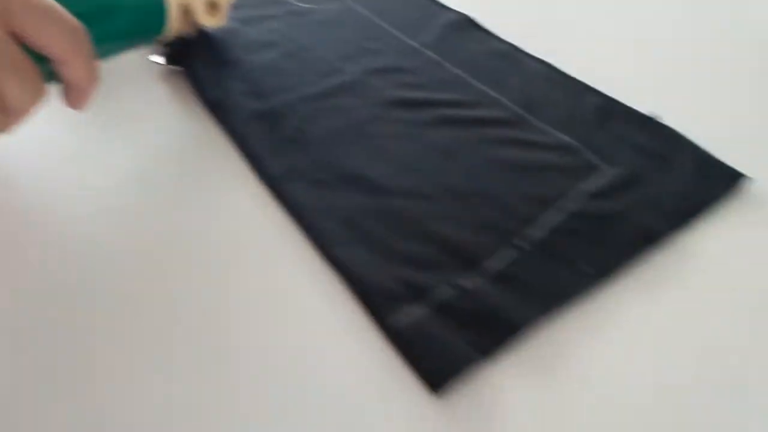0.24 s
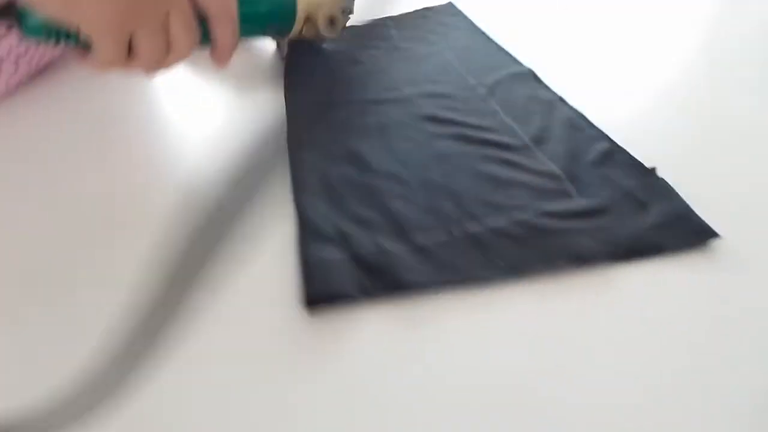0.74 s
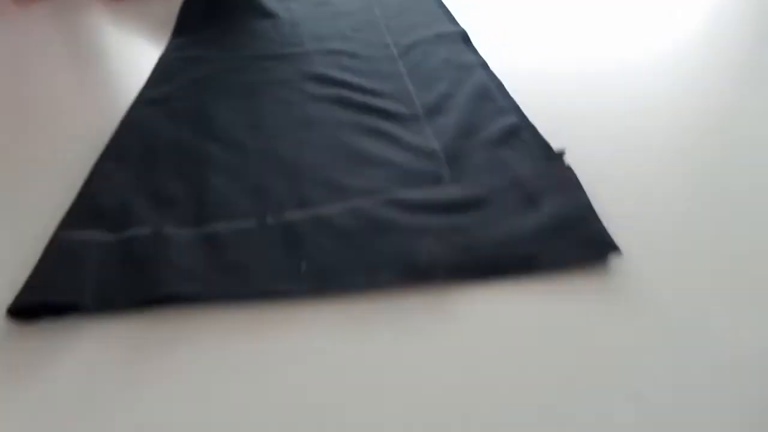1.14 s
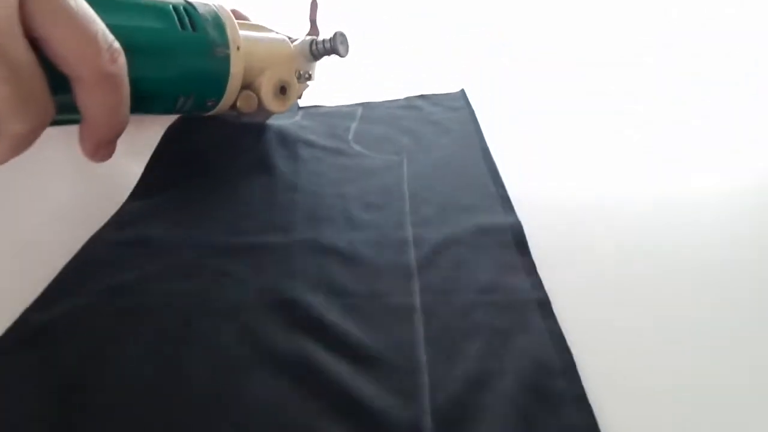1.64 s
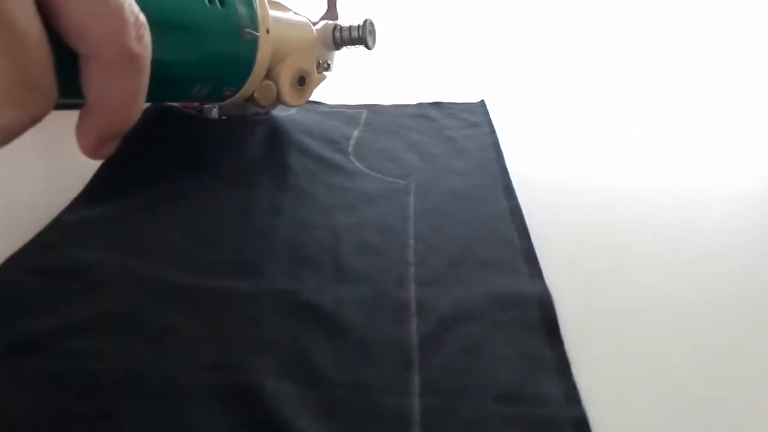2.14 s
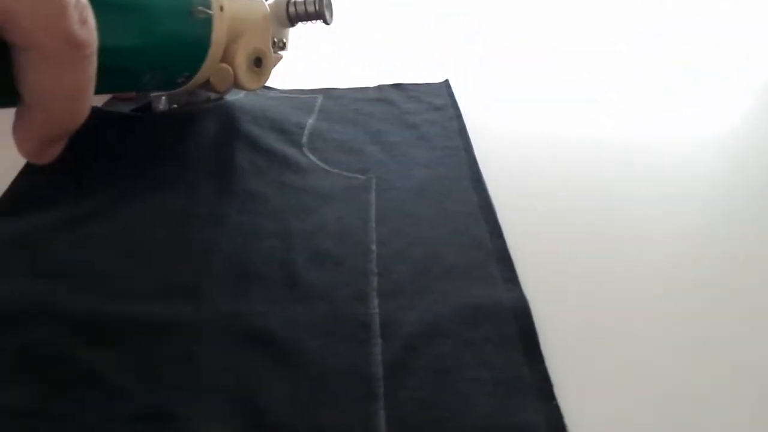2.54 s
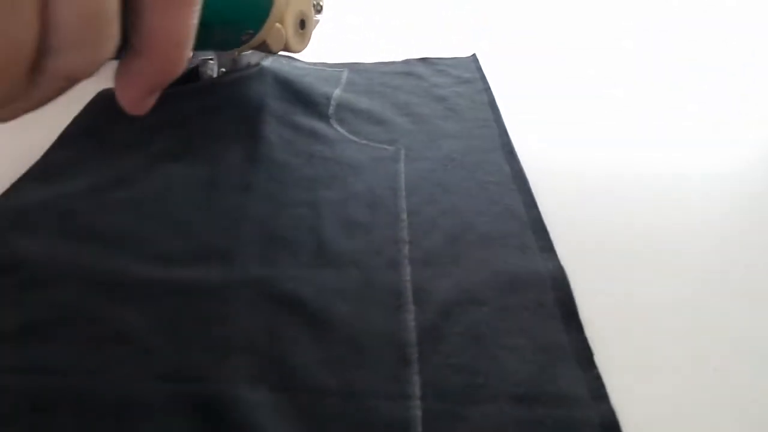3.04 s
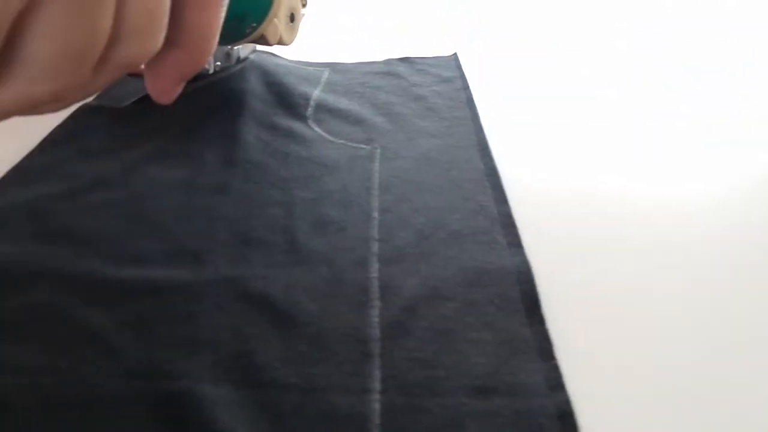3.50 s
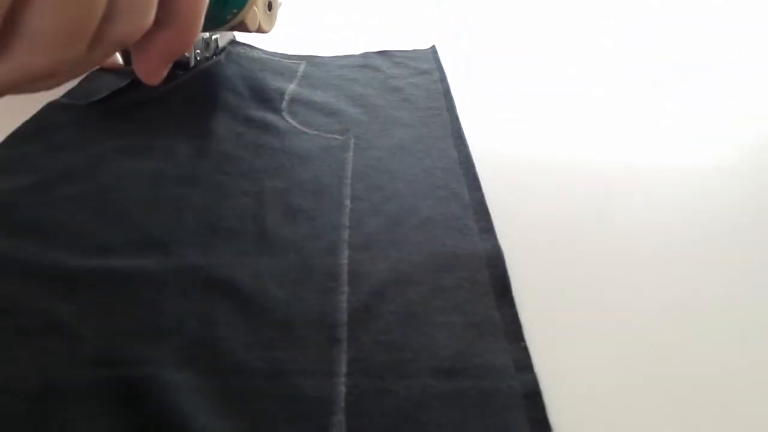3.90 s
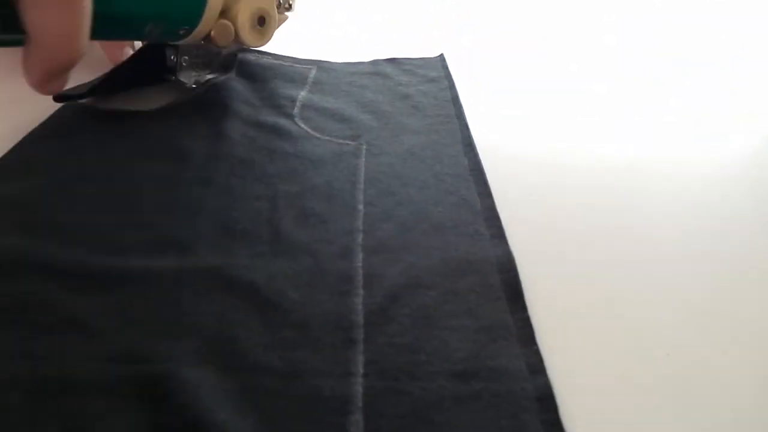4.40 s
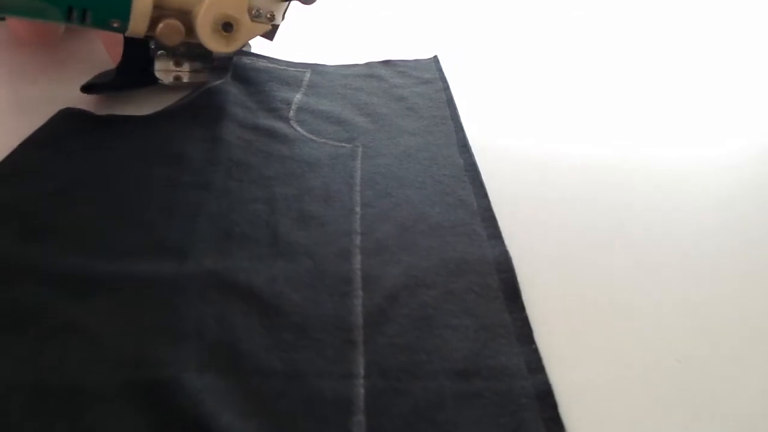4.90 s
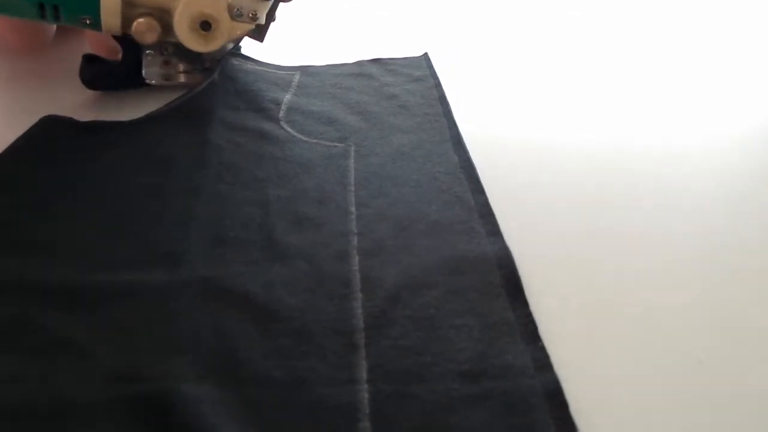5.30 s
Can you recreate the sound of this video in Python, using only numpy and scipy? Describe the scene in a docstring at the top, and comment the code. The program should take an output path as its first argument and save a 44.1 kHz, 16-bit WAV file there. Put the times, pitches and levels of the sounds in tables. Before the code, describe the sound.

A handheld electric round-blade cutter runs through cloth on a table, close to a stereo microphone in a quiet room. It is at full speed from the start: a motor hum throbbing about four times a second, a fast buzzing gear rattle, a hiss of cooling air that slowly fades, and a rapid, even scraping from the blade. High, thin metallic tones come and go as the blade rubs its guard. The scraping is strongest from about 1 to 3.5 seconds. At 4.2 seconds the motor switches off and the blade coasts to rest within a third of a second, with a short squeak near 4.4 and a few small clicks around 4.5. Separate light, sharp clicks from the tool follow at about 4.9, twice near 5.3, and at 5.5. Faint hiss and room murmur remain, with a faint low drone rising at the very end.

```python
"""A handheld round-blade cutter runs through cloth on a table, close to a stereo microphone in a quiet room.
From the start its motor hums and beats against the mains, the gear rattles once a shaft turn, cooling
air hisses, and the blade scrapes once a blade turn and sings against its guard in spells.
Switched off after about four seconds, it coasts to rest with a squeak and the tool clicks a few times.
A faint background hiss and room murmur come up again, and a low drone rises at the very end."""
import sys
import numpy as np
from scipy import signal
from scipy.fft import rfft, irfft
from scipy.io import wavfile
from scipy.ndimage import uniform_filter1d

SR = 44100
rng = np.random.default_rng(int(sys.argv[2]) if len(sys.argv) > 2 else 0)


def master(y):
    """Save y as 16-bit WAV."""
    cut = np.clip(np.atleast_2d(y).T, -1, 1)
    pcm = np.round(cut * 32767)  # scale
    wavfile.write(sys.argv[1], SR, pcm.astype(np.int16))


N = 244755
TIME, FREQS = np.arange(N) / SR, np.fft.rfftfreq(N, 1 / SR)
MAINS_HZ, GEAR_RATIO = 60.023, 5
SWITCH_OFF_S, COAST_S = 4.24, 0.33
LEFT_LEAD_S = 0.00014   # the cutter reaches the left of the microphone first
SCRAPE_POWER = 0.99   # the blade's touches fade with this power of the speed


def from_db(db):
    """Decibels to gain."""
    return 10 ** (np.asarray(db) / 20)


def rms_one(x):
    """Scale to unit power."""
    return x / np.sqrt(np.mean(x ** 2) + 1e-20)


def in_time(rows):
    """Each column of a curve at every sample."""
    seconds, *columns = np.transpose(rows)
    return [np.interp(TIME, seconds, column) for column in columns]


def over_hz(points):
    """A table joined on a log-frequency axis."""
    hz, value = np.transpose(points)
    return np.interp(np.log(FREQS + 1), np.log(hz), value)


def drift(rate_hz):
    """Slow random wavering of unit power, mostly below the given rate."""
    slow_hz = np.fft.rfftfreq(4096, 100 / SR)
    slow = irfft(rfft(rng.standard_normal(4096)) / (1 + (slow_hz / rate_hz) ** 2))
    return np.interp(np.arange(N) / 100, np.arange(len(slow)), rms_one(slow))


def grains(spread_db, count=3, size=N):
    """Unrelated streams of dense tiny contacts of uneven size."""
    contacts = rng.standard_normal((count, size))
    return rms_one(contacts * from_db(spread_db * rng.standard_normal((count, size))))


def once_a_turn(turns, angle, width, uneven_db, linger=3.0):
    """A bump of new strength each turn, falling `linger` times slower than it rises; angles in turns."""
    offset = turns - angle + .5
    strength = from_db(uneven_db * rng.standard_normal(1024))
    past = offset % 1 - .5
    bump = np.exp(-.5 * (past / width / np.where(past > 0, linger, 1)) ** 2)
    return strength[np.floor(offset).astype(int)] * bump


def wander():
    """Three random walks in phase; each blurs a tone to a width of 1 Hz."""
    walks = np.cumsum(rng.standard_normal((3, N)), axis=1)
    return uniform_filter1d(walks, size=14) * np.sqrt(2 * np.pi / SR)


def rubbed(pitch_hz, width_hz, walk):
    """A rubbed mode of unit power: even in strength, blurred in pitch."""
    phase = 2 * np.pi * np.cumsum(pitch_hz + np.zeros(N)) / SR
    return np.sqrt(2) * np.cos(phase + np.sqrt(width_hz) * walk)


def spell(start_s, length_s, swell_s, fade_s):
    """An envelope that swells up to its start, holds, then fades."""
    before = np.maximum(start_s - TIME, 0) / swell_s
    after = np.maximum(TIME - start_s - length_s, 0) / fade_s
    return np.exp(-np.minimum(before + after, 20))


def soft_noise(spectrum, spread_db, width):
    """A steady stereo noise of the given colour."""
    mid, side = irfft(rfft(grains(spread_db, count=2)) * from_db(over_hz(spectrum)), N)
    return rms_one(mid) + width * rms_one(side) * [[1], [-1]]


def at_microphone(streams, colour_db, lead_s=LEFT_LEAD_S):
    """One stream reaches both sides directly, the other two are each side's scatter; unit power."""
    # How alike the sides are. Each row: frequency in Hz, likeness (held to 0-1 below).
    likeness = [(100, -1.4), (400, 1.2), (700, 1.0), (1200, 0.3), (2500, 0.4), (5000, 0.46), (9000, -0.73),
                (15000, -0.5)]
    # The cutter's lean to one side. Each row: frequency in Hz, left over right in dB.
    tilt = [(60, -27), (92, -6), (140, 16), (210, -20), (330, 23), (500, -6), (770, 0), (1170, -1.5),
            (1790, -6), (2740, -11), (4190, -3), (6410, 3), (9810, 12), (15000, 3)]
    direct, *scattered = rfft(streams) * from_db(colour_db)
    alike = np.clip(over_hz(likeness), 0, 1)
    place = from_db(over_hz(tilt) / 2) * np.exp(1j * np.pi * FREQS * lead_s)
    pair = (np.sqrt(alike) * direct + np.sqrt(1 - alike) * np.array(scattered)) * [place, 1 / place]
    return rms_one(irfft(pair / np.hypot(abs(place), 1 / abs(place)), N))


def speed_share():
    """Share of full speed: without power, friction brakes the shaft evenly."""
    return np.clip(1 - (TIME - SWITCH_OFF_S) / COAST_S, 0, 1)


def coasting(power, room_t60_s=0.32):
    """Gain of a sound that falls with a power of the speed and lingers briefly in the room."""
    retained = from_db(-60 / (room_t60_s * SR)) ** 2
    lost = signal.lfilter([1 - retained], [1, -retained], 1 - speed_share() ** (2 * power))
    return np.sqrt(np.maximum(1 - lost, 0))


def beat(turns, field_turns=-0.055):
    """How far the shaft has run ahead of the pulsing field, in radians."""
    return 2 * np.pi * (turns - 2 * MAINS_HZ * TIME - field_turns)


def shaft_turns(start_turns=-0.119, sway_turns=0.022):
    """The shaft's angle; under power it sways about four times a second, at its beat with the field."""
    # Motor speed under power. Each row: time in seconds, shaft turns per second.
    speed = [(0.0, 123.13), (0.8, 123.94), (1.3, 124.32), (2.0, 123.42), (2.5, 124.61), (2.7, 123.92),
             (4.0, 124.71), (4.24, 126.94)]
    turns = start_turns + np.cumsum(in_time(speed)[0] * speed_share()) / SR
    return turns - sway_turns * np.sin(beat(turns)) * (TIME < SWITCH_OFF_S)


def motor_hum(turns, level_db=-29.5, flutter_turns=0.003, waver_db=0.8, die_s=0.0049):
    """Shaft orders mix with the pulsing field; each line swells once a beat and may throb with a partner."""
    # The hum changes colour as the tool turns. Times in seconds: far, near, moving off.
    colour_times = (1.0, 1.8, 3.9)
    # Magnetic lines. Each row: multiple of shaft speed, multiple of the field's pulsing, relative dB
    # far, near and moving off, swell 0-1, swell lag in beats, weaker partner's strength 0-1,
    # its offset in beat rates, throb lag in beats.
    magnetic_lines = [(0, 1, -26, -27, -29, 0, 0, 0, 0, 0), (3, 0, -13.5, -11, -11.5, .1, .38, 0, 0, 0),
                      (3, 1, -5.3, -3.1, -3.7, .15, .02, .42, 2, -.12),
                      (5, 0, -1, 3.2, 1.3, .2, .09, .5, -2, -.015),
                      (5, 1, -5, -5.5, -9.5, .42, .48, .36, -2, .06),
                      (6, 1, -11.5, -13.5, -15, .25, 0, .15, -2, -.14),
                      (7, 1, -13, -13, -14, .2, .23, .4, -2, -.08),
                      (9, 0, -13, -8.5, -8.5, .45, .45, 0, 0, 0), (10, 0, -20, -17, -17, .45, .4, 0, 0, 0),
                      (10, 1, -10.5, -8.5, -9, .25, .04, .12, 2, -.21)]
    # The uneven blade wheel. Each row: multiple of blade speed, relative level in dB.
    wobble = [(6, -30), (11, -32), (12, -23.5), (13, -26), (18, -20), (24, -15.5), (26, -34)]
    field, ahead = 2 * MAINS_HZ * TIME, beat(turns)
    poles = turns + flutter_turns * drift(9.0)
    lines = 0
    for order, field_order, *levels_db, swell, swell_lag, partner, offset, throb_lag in magnetic_lines:
        swelling = swell * np.cos(ahead - 2 * np.pi * swell_lag)
        throb = partner * np.exp(1j * offset * (ahead - 2 * np.pi * throb_lag))
        tone = np.exp(2j * np.pi * (order * poles + field_order * field))
        gain = from_db(np.interp(TIME, colour_times, levels_db) + waver_db * drift(8.9))
        lines = lines + gain * np.imag((1 + swelling + throb) * tone)
    wheel = sum(from_db(db) * np.sin(2 * np.pi * order * turns / GEAR_RATIO) for order, db in wobble)
    powered = np.exp(-np.maximum(TIME - SWITCH_OFF_S, 0) / die_s)
    left = from_db(level_db) * (lines + wheel) * powered
    return np.array([left, np.interp(TIME - LEFT_LEAD_S, TIME, left)])


def housing(ripple_db=2.5, spacing_hz=45):
    """The housing's response in dB: a few strong resonances over many small ones."""
    # Each row: frequency in Hz, width in Hz, lift in dB.
    resonances = [(1829, 153, 4.5), (2360, 72, -1.5), (2990, 290, 5), (4300, 100, 0), (5730, 220, 6.5),
                  (6160, 150, 6.5), (8490, 630, 7.5), (11600, 400, 10), (12500, 900, 5), (15600, 250, 7)]
    strong = sum(lift_db / (1 + (2 * (FREQS - hz) / width) ** 2) for hz, width, lift_db in resonances)
    small = np.interp(FREQS / spacing_hz, np.arange(2048), rng.standard_normal(2048))
    return strong + ripple_db * small


def gear_rattle(knock, feed, housing_db, free_db=-17.5, feed_db=-2.5):
    """The teeth grind in mesh and knock once a shaft turn, a little quieter under load."""
    # Each row: frequency in Hz, relative spectral level in dB.
    spectrum = [(30, -62), (120, -24), (220, -59), (400, -68), (700, -11.5), (1200, -12), (1800, -7.5),
                (2500, -7), (3500, 2.5), (4800, 2.5), (5600, -13), (6400, -10.5), (7000, -24), (9500, -27),
                (16000, -32.5)]
    grind = np.where(TIME < SWITCH_OFF_S, .62, .6)
    gain = from_db(free_db + feed_db * feed) * coasting(power=1.2)
    return gain * at_microphone(grains(4.15) * (grind + knock), over_hz(spectrum) + housing_db)


def blade_scrape(turns, feed, housing_db, free_db=-26, feed_db=6, surge_db=1):
    """The slightly warped blade touches its counter-edge twice in quick succession each blade turn."""
    # Each row: frequency in Hz, relative spectral level in dB.
    spectrum = [(30, -74), (300, -30.5), (1300, -17.5), (1650, -3), (2300, 2), (2600, -6), (3000, -0.5),
                (4000, -3), (6000, -11.5), (9000, -22.5), (16000, -58)]
    blade = turns / GEAR_RATIO
    first = once_a_turn(blade, angle=0.95, width=0.012, uneven_db=2.5)
    second = 0.84 * once_a_turn(blade, angle=0.15, width=0.012, uneven_db=2.0)
    # The touches are harder on each swell of the motor's pull.
    touch = (first + second) * from_db(surge_db * np.cos(2 * beat(turns)))
    gain = from_db(free_db + feed_db * feed) * coasting(SCRAPE_POWER)
    return gain * at_microphone(grains(3.4) * (0.5 + touch), over_hz(spectrum) + housing_db)


def cooling_air(housing_db, start_db=-20.5, fade_db_per_s=2, flicker_db=1.67):
    """A flickering hiss of air that fades as the vents turn away from the microphone."""
    # Each row: frequency in Hz, relative spectral level in dB.
    spectrum = [(30, -54), (300, -5), (1500, 9.5), (5000, 8), (8200, -1.5), (9300, -12), (11000, -6),
                (12300, -8.5), (14000, -23), (16000, -10.5)]
    flow = grains(1.0) * from_db(flicker_db * drift(31))
    gain = from_db(start_db - fade_db_per_s * TIME) * coasting(power=0.54)
    return gain * at_microphone(flow, over_hz(spectrum) + housing_db)


def blade_song(knock, steady=0.22, pitch_sag=0.17):
    """The blade sings against its guard in spells, rasping at each knock and sagging as it slows."""
    # Each row: start and length in seconds, first and last pitch at full speed in Hz,
    # width in Hz, relative level in dB.
    songs = [(0.22, 0.14, 3950, 4090, 90, -21), (0.38, 0.35, 4130, 4450, 210, -17.5),
             (0.42, 0.3, 6200, 6330, 110, -25.5), (0.0, 0.72, 15600, 15650, 60, -38),
             (0.0, 0.32, 11400, 11550, 250, -36), (0.99, 0.28, 1860, 1810, 90, -28),
             (1.05, 0.22, 6200, 6250, 150, -29), (0.9, 1.35, 8380, 8450, 200, -32),
             (1.15, 0.6, 11750, 11800, 250, -38), (1.6, 1.45, 6310, 6290, 60, -33),
             (1.6, 0.4, 5000, 4900, 300, -29), (2.1, 0.45, 2950, 2970, 40, -30),
             (2.05, 1.05, 4450, 4450, 250, -26), (3.2, 0.75, 4510, 4560, 65, -21),
             (4.05, 0.33, 4560, 4630, 80, -24.5)]
    walk, sag = wander(), 1 - pitch_sag * (1 - speed_share())
    song = 0
    for start_s, length_s, first_hz, last_hz, width_hz, db in songs:
        pitch_hz = sag * np.interp(TIME, [start_s, start_s + length_s], [first_hz, last_hz])
        envelope = from_db(db) * spell(start_s, length_s, swell_s=0.054, fade_s=0.018)
        song = song + envelope * rubbed(pitch_hz, width_hz, walk)
    return song * rms_one((steady + knock) * coasting(power=0.47))


def blade_ticks(blade, feed, full_feed_db=4):
    """The blade rings once a turn as it touches, louder the harder it is pushed."""
    # Each row: frequency in Hz, width in Hz, relative level in dB, fall time over rise time.
    modes = [(1815, 50, -24, 3.2), (2975, 25, -22, 4.5)]
    walk, ticks = wander(), 0
    for hz, width_hz, db, linger in modes:
        touch = once_a_turn(blade, angle=0.98, width=0.022, uneven_db=0.5, linger=linger)
        ticks = ticks + from_db(db) * rubbed(hz, width_hz, walk) * touch
    return ticks * from_db(full_feed_db) * feed * coasting(SCRAPE_POWER)


def background_hiss_and_room(hiss_db=1):
    """A faint background hiss and low room murmur, whose level sinks midway and rises again at the end."""
    # Hiss, then room. Each row: frequency in Hz, relative spectral level in dB.
    hiss_spectrum = [(410, -23), (700, -5), (777, -7.5), (3110, -3.5), (4550, -6.5), (6150, -17.5),
                     (10700, -26), (15000, -25), (16000, -26)]
    room_spectrum = [(25, -40), (50, -14), (75, 2), (107, 7.5), (150, 3.5), (190, -1.5), (226, 6),
                     (266, -2), (313, 2), (600, 2), (900, -8), (1500, -36)]
    # Each row: time in seconds, gain of both in dB.
    background = [(0, -52.5), (1.8, -50.5), (3.6, -57.5), (4.8, -57.5), (5.5, -50.5)]
    hiss = from_db(hiss_db) * soft_noise(hiss_spectrum, spread_db=0.5, width=1.0)
    room = soft_noise(room_spectrum, spread_db=3.5, width=0.27)
    return from_db(in_time(background)[0]) * (hiss + room)


def blade_squeaks(edge_s=0.009, width_hz=70.3):
    """The slowing blade rubs and squeaks as it comes to rest."""
    # Each row: start in seconds, length in seconds, pitch in Hz, relative level in dB.
    squeaks = [(4.36, 0.063, 2450, -31), (4.52, 0.03, 2470, -39.5), (4.585, 0.0093, 2340, -41.5)]
    walk = wander()
    return sum(from_db(db) * spell(start_s, length_s, edge_s, edge_s) * rubbed(hz, width_hz, walk)
               for start_s, length_s, hz, db in squeaks)


def cutter(scatter=0.4, blade_lead_s=0.00007):
    """The tool crosses the table, its parts timed by one shaft and loaded by one push."""
    # The push through the cloth. Each row: time in seconds, effort 0-1.
    push = [(0, 0.43), (.6, 0.62), (1.1, 0.94), (2.2, 0.81), (2.55, 0.72), (2.9, 0.92), (3.5, 0.73),
            (4.24, 0.13)]
    # The way past the microphone. Each row: time in seconds, left over right in dB, nearness in dB.
    path = [(0, -1.5, -1.1), (1.1, -0.5, -1), (1.7, 0.1, 0.43), (2.4, 1, 0.5), (3.3, 0, -0.46),
            (4.5, -0.5, -1)]
    feed, = in_time(push)
    pan_db, near_db = in_time(path)
    turns, housing_db = shaft_turns(), housing()
    knock = once_a_turn(turns, angle=0.21, width=0.039, uneven_db=1.5, linger=3.9)
    noises = gear_rattle(knock, feed, housing_db) + blade_scrape(turns, feed, housing_db)
    noises += cooling_air(housing_db)
    modes = blade_song(knock) + blade_ticks(turns / GEAR_RATIO, feed) + blade_squeaks()
    streams = modes * [[1], [scatter], [scatter]]
    low_cut_db = over_hz([(100, -30), (1200, -12)])
    # The blade's rim lies nearer the middle, so it leads on the left by less.
    ringing = np.std(modes) * at_microphone(streams, low_cut_db, blade_lead_s)
    return (noises + ringing + motor_hum(turns)) * from_db(near_db + pan_db * [[.5], [-.5]])


def tool_clicks(gain_db=-8.5, snap_above_hz=4000, chatter_s=0.0042, tail_db=-45, tail_t60_s=.35):
    """One hard touch knocks the body; the higher modes also get a brief chatter and a faint room tail."""
    # Each row: start in seconds, relative level in dB, left over right in dB,
    # extra dB of the body's knock, extra dB of the bright snap.
    clicks = [(4.481, -28, 0, 0, -4), (4.528, -17.5, 0, -1, 3), (4.537, -22, -4, -1, -5),
              (4.573, -28, -5, 1, -2), (4.922, -17, 7, -12, -3.5), (5.274, -12.5, 3, -0.5, 5),
              (5.339, -16, 5, 0.5, 3.5), (5.545, -13.5, 3, -1.5, 2.5)]
    # The tool's modes, body first. Each row: frequency in Hz, relative level in dB, T60 in seconds.
    modes = [(1074, -6.5, 0.028), (2100, -2, 0.0025), (3220, -1, 0.0064), (4260, -1, 0.0084),
             (4820, -3.5, 0.0094), (5830, -5, 0.0046), (7300, -16.5, 0.0076), (8700, -14.5, 0.0034),
             (13500, -23, 0.0026)]
    out, age = np.zeros((2, N + SR)), TIME[:SR // 2]
    touch = 1.0 * (age == 0)
    envelope = np.exp(-(age / chatter_s) ** 2) + from_db(tail_db - 60 * age / tail_t60_s)
    for start_s, click_db, pan_db, knock_db, snap_db in clicks:
        start = round(start_s * SR)
        gain = from_db(gain_db + click_db + pan_db * np.array([[.5], [-.5]]))
        chatter = grains(2.0, count=2, size=len(age)) * envelope
        chatter /= np.linalg.norm(chatter, axis=1, keepdims=True)
        for k, (hz, mode_db, t60_s) in enumerate(modes):
            decay, step = from_db(-60 / (t60_s * SR)), 2 * np.pi * hz / SR
            colour_db = knock_db if k == 0 else snap_db * (hz > snap_above_hz)
            force = touch + chatter * (k > 0) + 1e-18
            ring = signal.lfilter([0, np.sin(step)], [1, -2 * decay * np.cos(step), decay ** 2], force)
            out[:, start:start + len(age)] += (-1) ** k * gain * from_db(mode_db + colour_db) * ring
    return out[:, :N]


def low_drone(level_db=-53.5):
    """A faint, blurred low tone rises at the end."""
    envelope = spell(start_s=5.48, length_s=0.1, swell_s=0.21, fade_s=0.05)
    return from_db(level_db) * envelope * rubbed(pitch_hz=220, width_hz=19, walk=wander()[0])


def scene():
    """The cutter and its clicks, close up, over a faint hiss and a quiet room."""
    return background_hiss_and_room() + low_drone() + cutter() + tool_clicks()


def record(dry, ceiling=0.95, cutoff_hz=15780):
    """The highest peaks are rounded and the top is cut steeply."""
    rounded = dry / (1 + (dry / ceiling) ** 8) ** (1 / 8)
    low_pass = signal.ellip(10, .05, 60, cutoff_hz, fs=SR, output="sos")
    return signal.sosfiltfilt(low_pass, rounded)


dry = scene()
out = record(dry)
master(out)
```